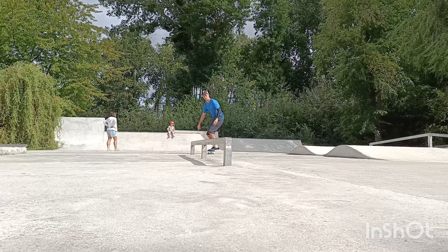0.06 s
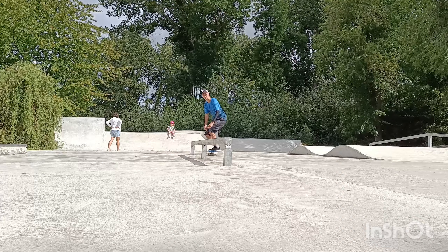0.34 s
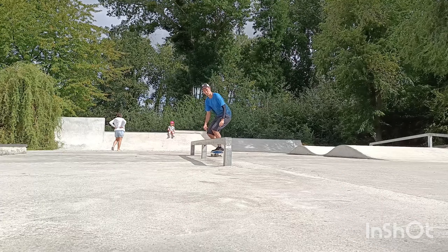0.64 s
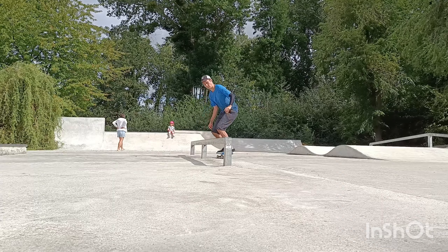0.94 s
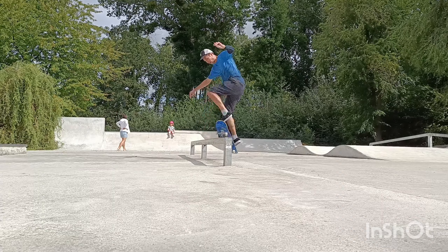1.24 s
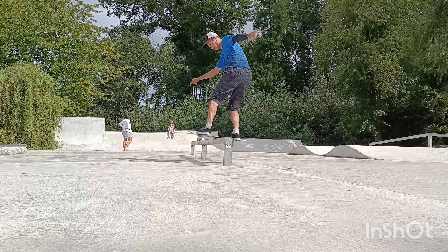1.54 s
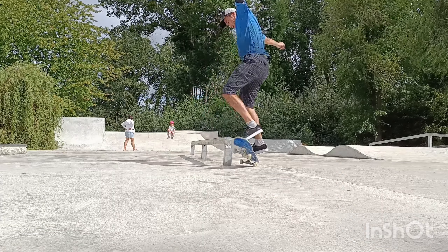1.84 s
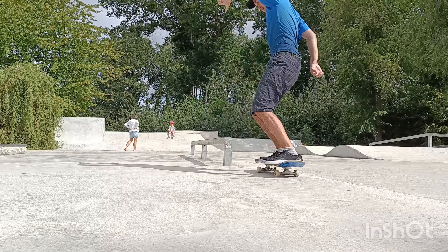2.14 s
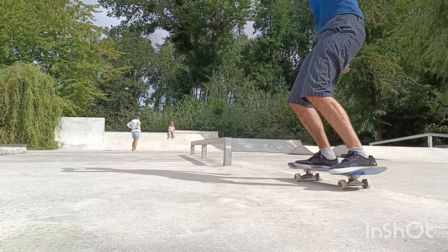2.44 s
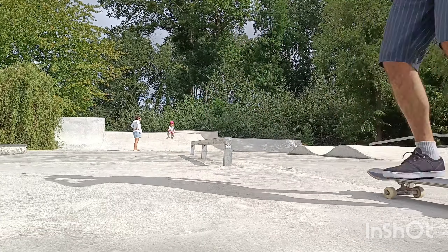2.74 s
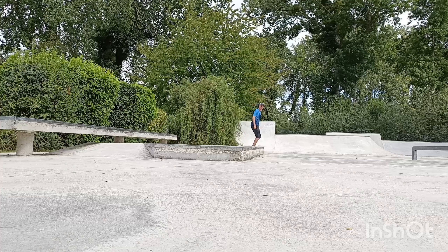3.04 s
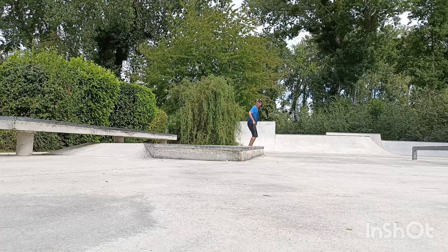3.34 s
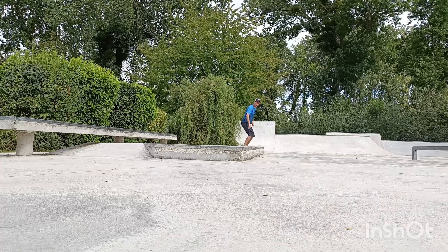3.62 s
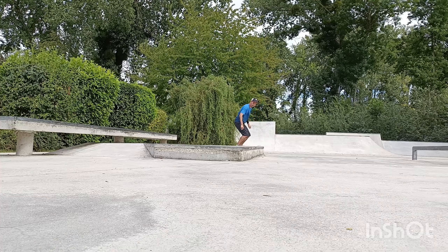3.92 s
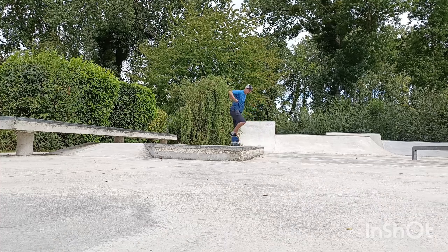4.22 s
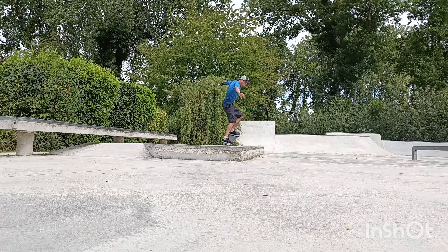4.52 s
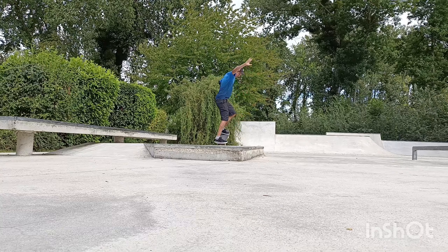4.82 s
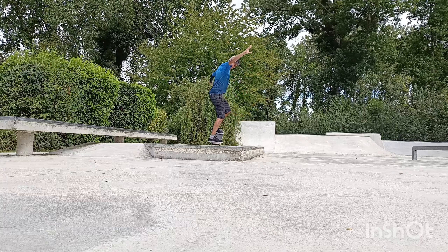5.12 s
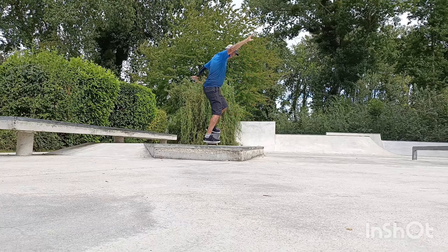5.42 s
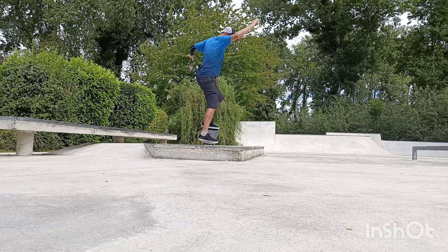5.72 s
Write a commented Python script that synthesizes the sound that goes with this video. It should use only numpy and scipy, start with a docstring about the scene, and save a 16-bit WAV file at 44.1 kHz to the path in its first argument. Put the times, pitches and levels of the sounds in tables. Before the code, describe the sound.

A skateboard snaps off concrete, hits a metal rail with a short ringing scrape and clatters down. Its wheels rumble louder, passing near the microphone to the right with a brief scuff. After a sudden change of spot, quieter clacks lead into a faint, grainy slide along a ledge with small squeaks. Low wind puffs touch the microphone, and soft leaf hiss continues throughout in the open air.

```python
"""An open concrete skate park ringed by trees: two skateboard tricks over leaves and steady hiss.
The board pops, slides down a ringing steel rail, lands and rolls close past to the right with a
short wheel skid. The scene changes: a farther pop lands on a concrete ledge and rasps along it
while wind nudges the microphone. Blows ring the deck and rattle the trucks; rolling and sliding
are grainy friction noise."""
import sys
import numpy as np
from scipy import signal
from scipy.fft import rfft, irfft, next_fast_len
from scipy.io import wavfile
from scipy.ndimage import map_coordinates

SR = 44100
rng = np.random.default_rng(int(sys.argv[2]) if len(sys.argv) > 2 else 0)


def wav_out(sig):
    """Save sig, one row per channel (or a flat mono array), as 16-bit PCM at SR to the path in sys.argv[1]."""
    wavfile.write(sys.argv[1], SR, np.round(np.clip(np.atleast_2d(sig).T, -1, 1) * 32767).astype(np.int16))


N = 254456
T = np.arange(N) / SR
POP_S, RAIL_ON_S, RAIL_OFF_S, LANDED_S = 1.265, 1.471, 1.582, 1.97   # the first trick
SCENE_CHANGE_S = 3.006


def from_db(db):
    """Decibels to gain."""
    return 10 ** (np.asarray(db) / 20)


def unit_rms(x):
    """Scale to an rms of 1."""
    return x / np.sqrt(np.mean(x ** 2) + 1e-20)


def gate(start, end, fade):
    """Open between two moments, with straight fades inside them."""
    return np.clip(np.minimum(T - start, end - T) / fade, 0, 1)


def swell(centre_s, width_s):
    """A bell-shaped rise and fall around a moment."""
    return np.exp(-((T - centre_s) / width_s) ** 2 / 2)


def drift(per_s):
    """Slow random wander, spread about 1."""
    return np.interp(T * per_s, np.arange(4096), rng.standard_normal(4096))


def delayed(x, seconds):
    """Read a signal through a fixed or moving delay."""
    return map_coordinates(x, [(T - seconds) * SR], order=3)


def low_pass(x, hz):
    """Second-order treble roll-off."""
    return signal.sosfilt(signal.butter(2, min(hz, .4 * SR), fs=SR, output="sos"), x)


def resonance(x, hz, q):
    """A single broad or narrow resonance."""
    return signal.lfilter(*signal.iirpeak(hz, max(q, .3), fs=SR), x)


def at_hz(points, hz):
    """Read a curve on a log-frequency axis."""
    point_hz, value = np.transpose(points)
    return np.interp(np.log(hz + 1), np.log(point_hz), value)


def noise(colour, size=N, likeness=None, grain_db=0):
    """Stereo noise of a given colour, rms 1; grain_db makes single grains stand out."""
    # Stereo image, unless likeness sets another. Each row: frequency in Hz, left-right correlation.
    usual_likeness = [(50, 0), (150, .7), (600, 0.91), (1200, 0.39), (2400, 0.12), (5000, 0)]
    n = next_fast_len(size, True)
    hz = np.arange(n // 2 + 1) * SR / n
    white = rng.standard_normal((2, n))
    grains = from_db(grain_db * np.repeat(rng.standard_normal(n // 32 + 1), 32)[:n])
    mid, side = rfft(white * grains)
    alike = np.clip(at_hz(likeness or usual_likeness, hz), -1, 1)
    skirts = 1 / np.sqrt((1 + (colour[0][0] / 2 / (hz + 1)) ** 8) * (1 + (hz / colour[-1][0] / 2) ** 8))
    stereo = np.sqrt(1 + alike) * mid + np.sqrt(1 - alike) * side * [[1], [-1]]
    return unit_rms(irfft(stereo * skirts * from_db(at_hz(colour, hz)), n)[:, :size])


def air():
    """A bed of leaves and steady hiss, with its own colour at each spot."""
    # The air by the rail and by the ledge. Each row: frequency in Hz, relative level in dB.
    by_rail = [(30, -24), (70, -2.5), (160, -1), (300, -8), (600, -9.5), (1000, -13.5), (1400, -12.5),
               (2300, -18.5), (5000, -19), (8600, -13), (9700, -27.5), (13000, -43), (15500, -33.5)]
    by_ledge = [(30, -42), (80, -8.5), (130, -0.5), (250, -10.5), (400, -9.5), (800, -16), (1700, -17),
                (2400, -23.5), (5200, -23.5), (8800, -26), (10000, -39), (13500, -58), (15500, -37)]
    return np.where(T < SCENE_CHANGE_S, from_db(-59.5) * noise(by_rail), from_db(-60) * noise(by_ledge))


def wind(eddies_per_s=18, eddy_db=6.5):
    """Each microphone port is buffeted by its own eddies: short puffs and one broad gust."""
    # The strongest puffs. Each row: centre and width in seconds, left and right level in dB.
    strong_puffs = [(2.68, 0.023, -34.5, -62), (2.945, 0.029, -33, -49), (4.336, .026, -49.5, -67),
                    (4.736, .03, -36.5, -57), (4.815, 0.0057, -29, -29.5), (4.867, 0.027, -41.5, -33.5),
                    (4.982, 0.017, -38.5, -48), (5.067, 0.027, -40, -51), (5.159, 0.0064, -40, -46.5),
                    (5.271, 0.031, -58, -35.5), (5.528, 0.014, -51, -35.5), (5.592, 0.016, -47, -34)]
    # Low buffeting. Each row: frequency in Hz, relative level in dB.
    buffet_colour = [(35, -15), (62, 3), (120, 5), (180, -3.5), (300, -21.5), (600, -37.5)]
    puffs = sum(from_db([[left], [right]]) * swell(s, width) for s, width, left, right in strong_puffs)
    eddies = from_db([side_db + eddy_db * drift(eddies_per_s) for side_db in (-51, -62.5)])
    gust = eddies * swell(4.84, 0.29)
    return np.hypot(puffs, gust) * noise(buffet_colour, likeness=[(50, 0.044), (300, 0.36)])


def park_echo(x, near_db=-15.5, near_t60=0.35, far_db=-33, far_t60=0.41):
    """Quick scatter from the ramps and a faint wash from the trees."""
    # Tone of the echo. Each row: frequency in Hz, relative level in dB.
    echo_colour = [(100, -10.5), (350, 2), (650, -5.5), (1300, -3), (2300, -1.5), (3500, 4), (8000, 2.5),
                   (16000, -21.5)]
    t = np.arange(SR) / SR
    ramps = from_db(near_db - 60 * t / near_t60) / np.sqrt(near_t60)
    trees = from_db(far_db - 60 * t / far_t60) / np.sqrt(far_t60)
    build_up = np.clip(t / 0.022, 0, 1)
    response = noise(echo_colour, size=SR) * (ramps + trees) * build_up * np.sqrt(np.log(1e6) / SR)
    return signal.fftconvolve(x, response, axes=1)[:, :N]


def run_up(start_db=-72, rise_db_per_s=7.5, crouch_db=8):
    """Far wheels roll up to the rail, are pressed down in the crouch and fall silent at the pop."""
    # Wheels behind the rail. Each row: frequency in Hz, relative level in dB.
    wheel_colour = [(200, -12), (370, -0.5), (650, -2), (1000, -8.5), (1400, 3), (1850, -4), (3000, -20)]
    db = start_db + rise_db_per_s * T + crouch_db * swell(1.11, 0.03)
    return from_db(db) * gate(0, POP_S, .005) * noise(wheel_colour, grain_db=2)


def free_spin(end_s=1.92, end_db=-53, rise_db_per_s=67.5):
    """The bearings whirr in the drop from the rail, louder as they near."""
    # Bearing whirr. Each row: frequency in Hz, relative level in dB.
    whirr_colour = [(700, -10), (1100, -2), (1800, -10.5), (2250, -0.5), (3000, -12.5), (5000, -18)]
    db = end_db - rise_db_per_s * np.maximum(end_s - T, 0)
    return from_db(db) * gate(RAIL_OFF_S, end_s, .01) * noise(whirr_colour, grain_db=3)


def squeaks(q=18):
    """Wheels, trucks and deck stick and slip in brief, unsteady tones, out of step left and right."""
    # Each row: centre in seconds, pitch in Hz, width in seconds, level in dB.
    slips = [(2.711, 3540, .012, -41.5), (2.824, 2250, 0.0096, -41.5), (3.335, 2010, .014, -63),
             (4.87, 1788, .0076, -43.5), (5.094, 1726, 0.0096, -46), (5.203, 3160, 0.007, -49),
             (5.323, 2280, .015, -50), (5.245, 1500, 0.02, -45.5), (5.26, 2350, 0.013, -49.5),
             (5.637, 2600, 0.0069, -46)]
    out = np.zeros((2, N))
    for s, hz, width, db in slips:
        span = abs(T - s) < 4 * width
        mid, side = rng.standard_normal((2, SR // 2))[:, :span.sum()]
        hiss = mid + .7 * side * [[1], [-1]]
        tone = resonance(resonance(hiss, hz, q), hz, q / 3)
        out[:, span] += from_db(db) * swell(s, width)[span] * unit_rms(tone)
    return out


def ledge_slide(chatter_db=3.5, catch_db=5.5, rasp_q=9, fade_s=0.013):
    """The board rasps along the ledge, its resonances catching at random, while the wheels murmur."""
    # Friction on concrete, and far wheels. Each row: frequency in Hz, relative level in dB.
    rasp_colour = [(700, -16), (1100, -20.5), (1550, -8.5), (2300, -5), (3000, -8), (4000, -14),
                   (5500, -17), (8500, -6.5), (10000, -13)]
    wheel_colour = [(150, 5), (350, 2.5), (700, -2), (1100, -3.5), (1600, -9), (3000, -28)]
    # The board bites on the ledge. Each row: start in seconds, length in seconds, level in dB.
    scrapes = [(4.698, 0.13, -55.5), (4.848, 0.056, -55), (4.909, 0.14, -63), (5.059, 0.061, -52.5),
               (5.183, 0.16, -53), (5.505, 0.055, -56.5), (5.559, .09, -53)]
    friction = noise(rasp_colour, likeness=[(1000, 0.21), (2200, -0.49), (5000, -0.12)], grain_db=2.5)
    caught = sum(from_db(catch_db * drift(45)) * resonance(friction, hz, rasp_q)
                 for hz in np.geomspace(1100, 4600, num=8))
    bites = sum(from_db(db) * gate(s, s + length, fade_s) for s, length, db in scrapes)
    pressure = bites + from_db(-60) * gate(4.60, 5.39, .04)   # bursts on top of a steady drag
    rasp = pressure * from_db(chatter_db * drift(90)) * unit_rms(low_pass(caught, 7000))
    wheels_down = from_db(-51.5) * gate(5.66, np.inf, fade_s)   # at the end they roll on the ledge
    wheel_load = from_db(-5) * pressure + wheels_down
    return rasp + wheel_load * noise(wheel_colour, grain_db=2.5)


def rail_slide(bite_db=-28, sag_db_per_s=66, release_db_per_s=249.5, ring_db=-13, flutter_db=3.5):
    """Wood rubs along steel in tiny slips, which keep the tube ringing after the board has left."""
    # The rub. Each row: frequency in Hz, relative level in dB.
    rub_colour = [(100, -19.5), (150, -12.5), (310, -4.5), (520, -16), (750, -9), (1200, -8.5), (1900, -3),
                  (2800, -6), (5000, -7.5), (6400, -11.5), (7600, -19.5), (9000, -21.5), (11500, -46),
                  (16000, -33.5)]
    # The steel tube's modes. Each row: pitch in Hz, relative level in dB, seconds to fade by 60 dB.
    rail_modes = [(750, -9.5, .15), (963, 1, .6), (1420, -8, 0.68), (1500, -4.5, .2), (1890, -3, 0.22),
                  (2250, -4, 0.31), (3170, -7, .15), (3580, -10.5, .2), (4900, -9.5, .16), (5700, -4, .12)]
    sag_db = sag_db_per_s * np.clip(T - RAIL_ON_S, 0, RAIL_OFF_S - RAIL_ON_S)
    release_db = release_db_per_s * np.maximum(T - RAIL_OFF_S, 0)
    force = from_db(bite_db - sag_db - release_db) * gate(RAIL_ON_S, LANDED_S, 0.0021)
    out = force * noise(rub_colour, grain_db=3)
    for hz, db, t60 in rail_modes:
        retained = from_db(-120 / (t60 * SR))   # each mode stores the rubbing and leaks it
        energy = signal.lfilter([1 - retained], [1, -retained], force ** 2 + 1e-18)
        phase = 2 * np.pi * hz * T + 0.37 * np.array([drift(35), drift(35)])   # a slight waver
        out += from_db(ring_db + db + flutter_db * drift(60)) * np.sqrt(energy) * np.sin(phase)
    return out


def straight_pass(nearest_s=2.70, nearest_m=0.93, speed_m_per_s=3.68):
    """The passing board's nearness (1 at the closest) and its sweep to the right (0 to 1)."""
    along_m = speed_m_per_s * (T - nearest_s)
    return nearest_m / np.hypot(nearest_m, along_m), .5 + np.arctan2(along_m, nearest_m) / np.pi


def wheel_roar(near, near_db, reflection=0.92, longest_delay_s=.0046):
    """Hard wheels roar on rough concrete, dullest from close above; a dull reflection sweeps through."""
    # Each row: frequency in Hz, relative level in dB.
    roar_colour = [(200, -15.5), (300, -4.5), (430, -4.5), (750, -9), (1100, -12.5), (1800, -14),
                   (2400, -24.5), (3500, -27.5)]
    roar = noise(roar_colour, likeness=[(300, 1.0), (2000, 0.77)], grain_db=-0.5)
    treble = signal.sosfilt(signal.butter(1, 1000, "high", fs=SR, output="sos"), roar)
    treble_gain = from_db(-18 - 4.25 * np.maximum(near_db, -8))
    roar = roar + (treble_gain - 1) * treble
    bounce = np.array([delayed(low_pass(side, 1000), longest_delay_s * near) for side in roar])
    return (roar + reflection * bounce) / np.hypot(1, reflection)


def grit_and_skid(skid_s=2.69, lift_db=2.4, flutter_db=3.5):
    """The thin sizzle of grit and bearings turns into a broad scuff as the wheels slip sideways."""
    # Rolling sizzle and skid. Each row: frequency in Hz, relative level in dB.
    grit_colour = [(1500, -10.5), (2200, -12), (2900, -23.5), (4500, -9), (7000, -2.5), (9000, 3.5),
                   (10300, -20), (12500, -20), (15300, -11.5), (16500, -24.5)]
    skid_colour = [(1400, -5), (2250, -2), (4000, -6), (5500, -1.5), (8000, 2), (10500, -9.5), (12500, -24),
                   (15300, -10)]
    # How loud the sizzle and skid are over time. Each row: time in seconds, relative level in dB.
    grit_level = [(2.03, -48), (2.054, -50), (2.158, -59), (2.328, -54.5), (2.376, -45.5), (2.44, -53.5),
                  (2.66, -53.5), (2.828, -34.5), (2.898, -58.5), (2.96, -50), (2.99, -56)]
    slip = gate(skid_s, 3.3, 0.042)
    sizzle = np.sqrt(1 - slip) * noise(grit_colour, grain_db=3)
    scuff = np.sqrt(slip) * noise(skid_colour, grain_db=3)
    grit_db = np.interp(T, *np.transpose(grit_level))
    return from_db(lift_db + grit_db + flutter_db * drift(110)) * (sizzle + scuff)


def roll_past(stall_s=2.778, bumps_db=1.25, pan_db=7.5, left_lag_s=.00055, shudder_t60=0.5):
    """The landed board rolls by: roar and rumble swell as it nears, and the wheels sweep right."""
    # Low rolling rumble. Each row: frequency in Hz, relative level in dB.
    rumble_colour = [(30, -22.5), (60, -18.5), (130, 8.5), (280, 1.5), (400, -8.5), (700, -35)]
    near, swept = straight_pass()
    near_db = 20 * np.log10(near)
    turning = from_db(-32 * swell(stall_s, .025) + bumps_db * drift(50))   # the wheels stall mid-skid
    wheels = from_db(-32.5 + 1.69 * near_db) * turning * wheel_roar(near, near_db) + grit_and_skid()
    pan = from_db(pan_db * swept * np.array([[-.5], [.5]]))
    wheels = np.array([delayed(wheels[0], left_lag_s * swept), wheels[1]]) * pan
    shudder = from_db(-32 - 60 * np.maximum(T - LANDED_S, 0) / shudder_t60)   # the deck settles
    rumble_level = from_db(-31 + 3.9 * near_db) + shudder
    rumble = rumble_level * from_db([[1.5], [-1.5]]) * noise(rumble_colour) * turning
    return (wheels + rumble) * gate(LANDED_S, SCENE_CHANGE_S, 0.0035)


def knocks(snap=2.3, ring=0.1, clatter=0.61, rise_s=.0006, wood_hz=(110, 4400), left_lag_s=.00003):
    """Each blow is a snap, a ringing deck and a clatter of hardware, coloured by where it strikes."""
    # Pops, landings and bumps. Each row: start in seconds, body level in dB, colour in Hz,
    # treble crack level in dB, seconds for the contact to fade by 60 dB.
    blows = [(0.121, -57.5, 1280, -63, 0.058), (1.117, -51, 338, -58, 0.2),
             (1.2617, -25.5, 2800, -34.5, 0.0058), (1.2623, -17.5, 1380, -44, 0.019),
             (1.263, -36, 428, -63, 0.15), (1.470, -22.5, 1150, -23, 0.017),
             (1.499, -39.5, 183, -79, 0.039), (1.912, -19.5, 1780, -28, 0.022),
             (1.915, -23.5, 387, -27, 0.086), (1.924, -23.5, 1800, -26, 0.038),
             (1.9446, -19.5, 1320, -21, 0.042), (1.951, -18, 970, -23, 0.06),
             (1.9842, -18.5, 634, -27.5, 0.022), (1.9926, -14, 774, -24.5, 0.024),
             (2.076, -31, 724, -37.5, 0.068), (2.318, -32, 407, -93, 0.3), (2.364, -33, 750, -76, 0.23),
             (2.541, -36.5, 444, -58, 0.021), (2.629, -43, 210, -74, 0.065), (2.862, -28, 416.7, -71, 0.14),
             (2.954, -32, 408, -59, 0.074), (3.971, -59, 1197, -68, 0.039),
             (4.343, -26.5, 1800, -41.5, 0.027), (4.348, -30.5, 1090, -78, 0.033),
             (4.359, -39.5, 2320, -43, 0.096), (4.487, -36, 930, -36, 0.15),
             (4.494, -31.5, 585, -36, 0.021), (4.495, -31.5, 260, -60, 0.2), (4.507, -29.5, 780, -40, 0.11),
             (5.076, -46.5, 1500, -65, 0.099), (5.672, -49.5, 827, -62.5, 0.14)]
    # Deck and truck modes. Each row: pitch in Hz, relative level in dB, nominal decay in seconds.
    deck_modes = [(160, -12.5, 0.054), (321.8, 1, 0.029), (440, -10.5, .06), (540, -4.5, 0.052),
                  (681, -5, .05), (883, -11, 0.046), (1094, -2.5, 0.033), (1333, -1.5, 0.018),
                  (1840, -12, 0.053), (2120, -8, .035), (2550, -4.5, 0.038), (3570, -10, 0.038)]
    # The treble crack. Each row: frequency in Hz, relative level in dB.
    crack_colour = [(1200, -17.5), (2500, -1), (4000, 1.5), (6000, -0.5), (8800, 1.5), (10500, -15),
                    (13000, -23.5), (15300, -9), (16500, -23.5)]
    crack_likeness = [(2000, .4), (4500, -0.39), (8000, -.35), (12000, -.1)]
    wood_band = signal.butter(4, wood_hz, "band", fs=SR, output="sos")   # the range wood radiates
    t = np.arange(int(.2 * SR)) / SR
    out = np.zeros((2, N + len(t)))
    hz, mode_db, t60 = np.array(deck_modes).T[:, :, None]
    for s, body_db, colour_hz, crack_db, contact_t60 in blows:
        strength = from_db(mode_db + rng.standard_normal(hz.shape))
        ring_t60 = t60 * np.sqrt(contact_t60 / 0.014)   # brief, hard contacts are damped sooner
        loaded_hz = hz * (1 + 0.014 * rng.standard_normal(hz.shape))   # the feet shift the modes
        modes = np.sum(strength * np.cos(2 * np.pi * loaded_hz * t) * from_db(-60 * t / ring_t60), axis=0)
        contact = from_db(-60 * t / contact_t60) * (1 - np.exp(-t / rise_s))
        mid, side = rng.standard_normal((2, len(t)))
        hardware = contact * (mid + 0.47 * side * [[1], [-1]])
        body = snap * (t == 0) + ring * modes + clatter * hardware
        q = 0.36 + 0.1052 * (body_db - crack_db)   # the colour narrows as the body outweighs the crack
        body = resonance(resonance(body, colour_hz, q), colour_hz, 0.7)
        body = signal.sosfilt(wood_band, low_pass(body, 4 * colour_hz))
        crack = noise(crack_colour, size=len(t), likeness=crack_likeness) * contact
        blow = from_db(body_db) * unit_rms(body) + from_db(crack_db) * unit_rms(crack)
        start = int(s * SR)
        out[:, start:start + len(t)] += blow / np.sqrt(10)   # levels count the energy as if in 20 ms
    return np.array([delayed(out[0, :N], left_lag_s), out[1, :N]])


def scene():
    """Knocks, rail, squeaks and bearings with their echo, plus dry rolling, ledge, wind and air."""
    board = knocks() + rail_slide() + squeaks() + free_spin()
    return board + park_echo(board) + run_up() + roll_past() + ledge_slide() + wind() + air()


def record(dry):
    """Peaks stop at full scale and the top is cut steeply, 70 dB down at 17.1 kHz."""
    top_cut = signal.cheby2(14, 70, 17100, fs=SR, output="sos")
    return signal.sosfilt(top_cut, np.clip(dry, -1, 1))


dry = scene()
out = record(dry)
wav_out(out)
```